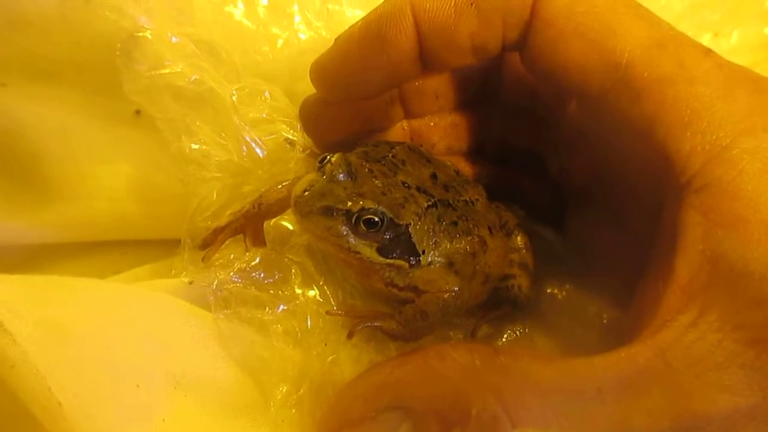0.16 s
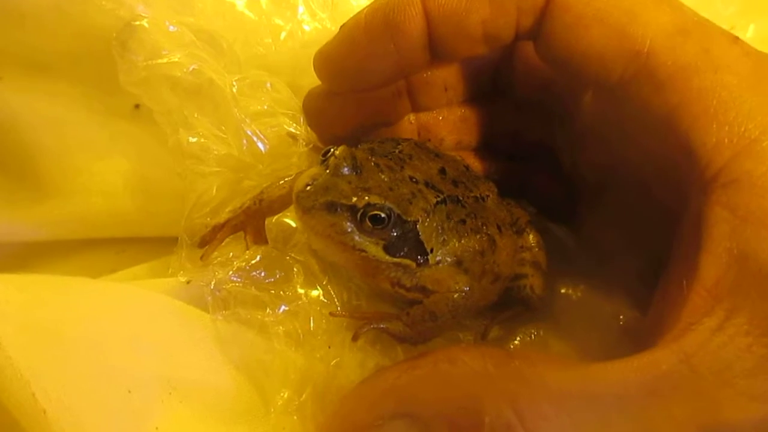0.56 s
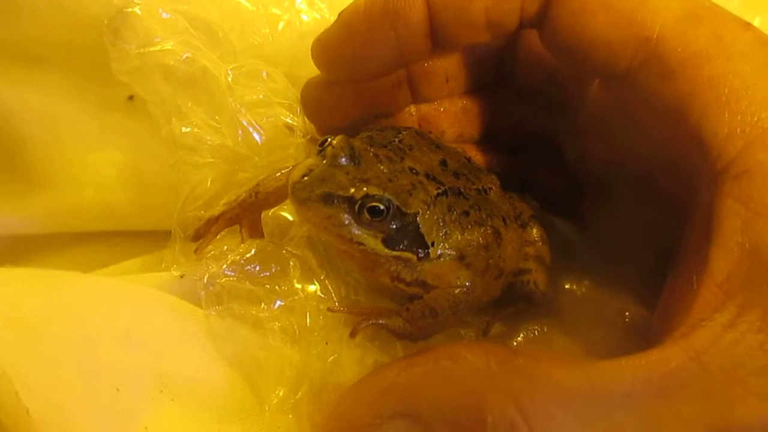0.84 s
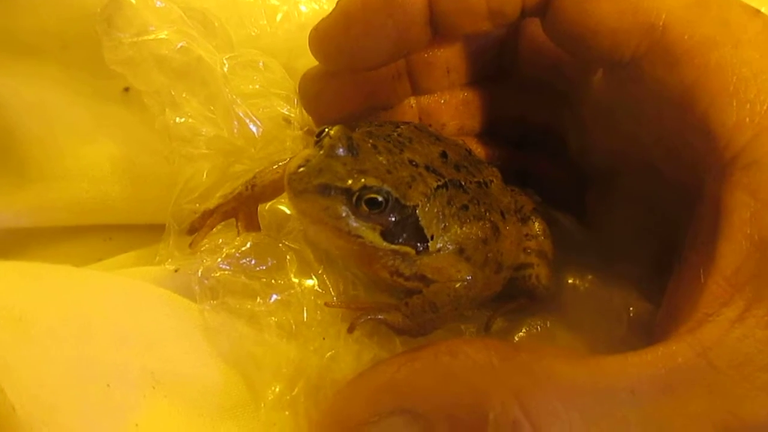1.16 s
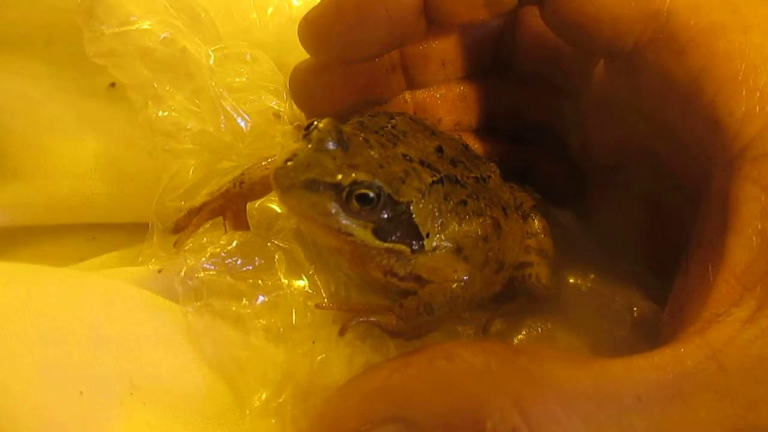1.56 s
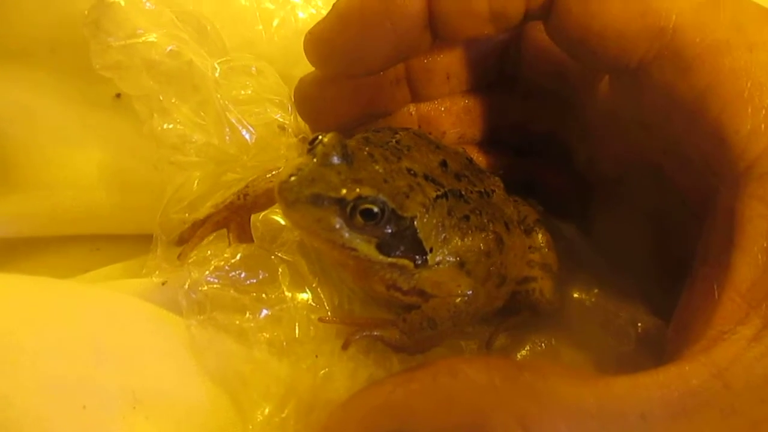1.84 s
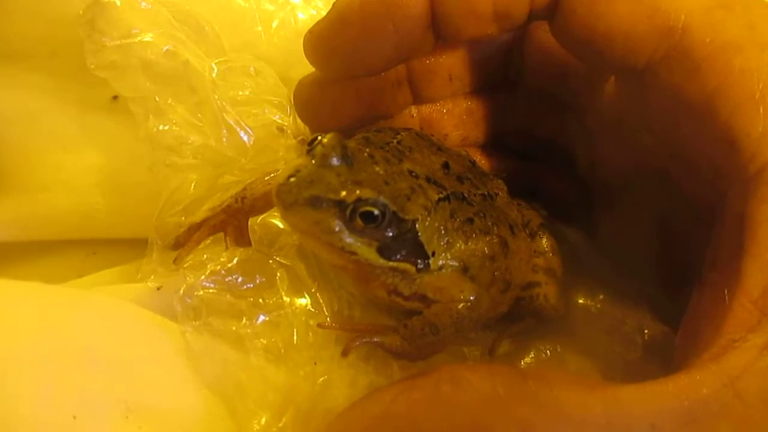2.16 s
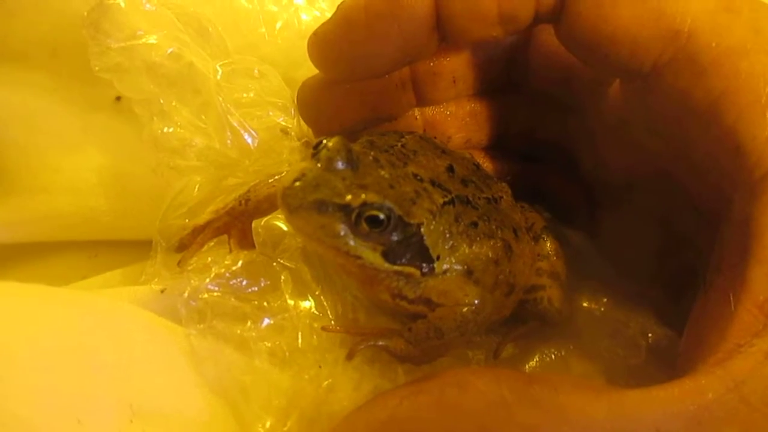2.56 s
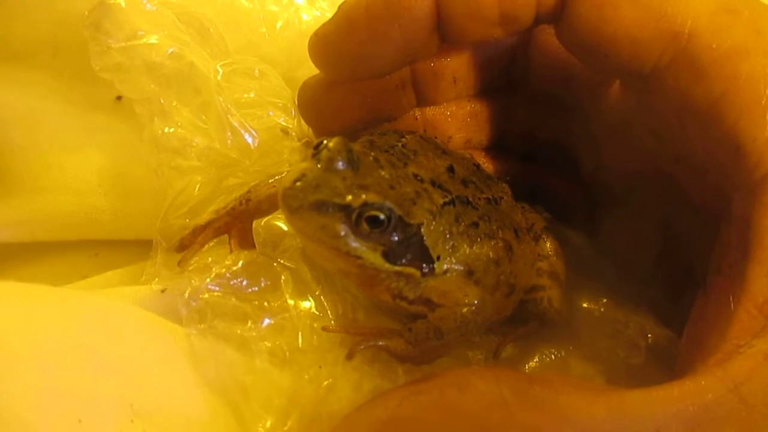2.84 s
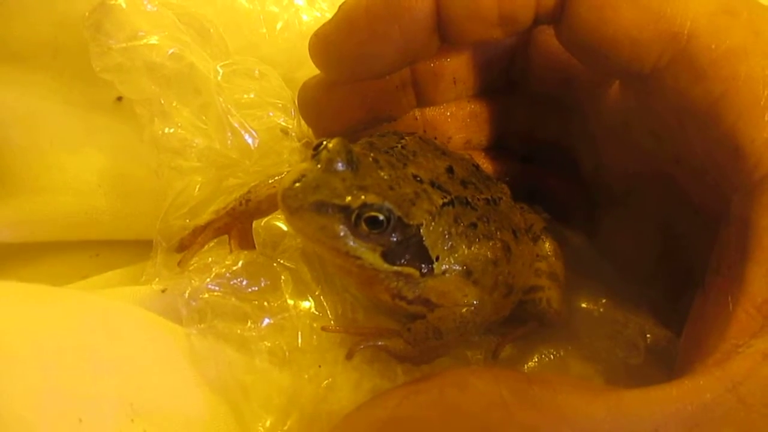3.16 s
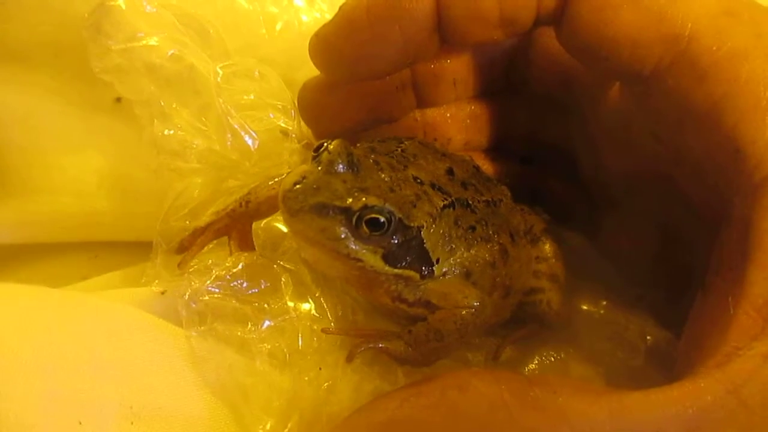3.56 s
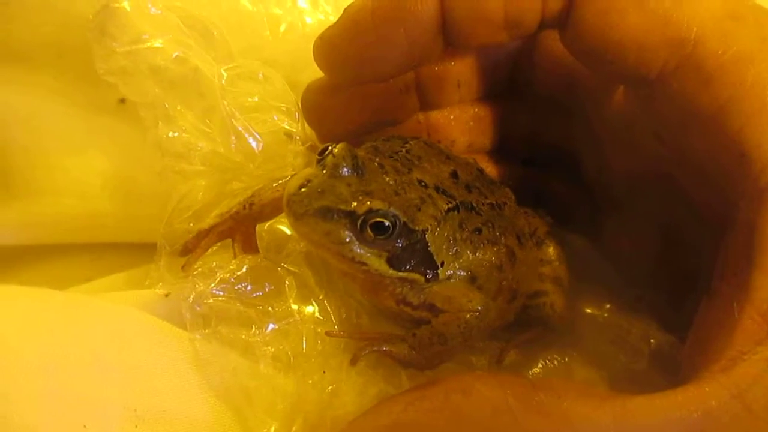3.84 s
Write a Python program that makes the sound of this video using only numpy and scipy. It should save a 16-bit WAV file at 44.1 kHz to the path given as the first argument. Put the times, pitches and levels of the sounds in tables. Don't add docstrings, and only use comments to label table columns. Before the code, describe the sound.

A small frog held in a wet hand, close to the microphone: steady hollow hum and hiss first, one faint croak, then a rapid run of short low croaking pulses, ending with a strong deeper one.

```python
import sys
import numpy as np
from scipy import signal
from scipy.fft import rfft, irfft
from scipy.io import wavfile

SR = 44100
rng = np.random.default_rng(int(sys.argv[2]) if len(sys.argv) > 2 else 0)


def invert_db(level):
    return 10 ** (np.asarray(level, dtype=float) / 20)


def dump_mix(stems):
    frames = np.atleast_2d(stems).T
    limited = np.clip(frames, -1, 1)
    pcm = np.round(limited * 32767).astype(np.int16)
    wavfile.write(sys.argv[1], SR, pcm)


N = 176400

# start in seconds, peak in dB, crack in dB.
DEEP_PULSES = [
    (2.5374, -9, -37.5),
    (3.8869, -12.5, -45.5),
    (3.4420, -39.5, -70),
]
# start in seconds, peak in dB, throat tension 0-1, sac ring in dB, crack in dB.
RUN_PULSES = [(2.7294, -13, .99, -46, -39.5), (2.8090, -19.5, 0.45, -35, -49),
              (2.8861, -12, 0.87, -32.5, -37), (2.9636, -20, 0.3, -36.5, -52),
              (3.0423, -22.5, 0.4, -36, -51), (3.1202, -22.5, 0, -39.5, -51), (3.2040, -26.5, 0, -48, -52),
              (3.2858, -15.5, 0.83, -48, -46.5), (3.3633, -22, 0.2, -46.5, -52),
              (3.479, -33.5, 0.9, -70, -57), (3.525, -25, .02, -45, -55), (3.604, -29, .02, -52, -54),
              (1.949, -37.5, .02, -50, -62), (3.9950, -36, .05, -70, -51)]
# start in seconds, level in dB.
FIRST_PULSE = (1.8885, -26.5)
DEEP_MODES = [(466, -1.5, .033), (591, -10, .063), (627, -4.4, .115), (741, -7, .032), (985, 1.5, .017),
              (1303, -10.4, .033), (1780, -9, .013), (985, -29, .2)]
DEEP_SIGNS = [-1, -1, 1, 1, -1, -1, -1, -1]
TENSE_MODES = [(139, -25, .1), (450, -17, .09), (510, .5, .024), (704, -16, .057), (896, -8, .02),
               (1020, 3.5, .012), (1295, -5.7, .036), (1462, -7.5, .036), (2092, -18.4, .015)]
TENSE_SIGNS = [1, -1, -1, -1, 1, 1, -1, 1, -1]
SLACK_MODES = [(146, -17, .08), (397, -16, .04), (513, 3.4, .02), (676, -23, .032), (715, -9.4, .028),
               (1024, -.4, .013), (1223, -16, .024), (1309, -13, .032), (1487, -22, .026), (800, -20, .05)]
SLACK_SIGNS = [1, 1, -1, 1, -1, 1, 1, -1, 1, 1]
FIRST_MODES = [(520, -6, .033), (582, -6.5, 0.06), (820, -11, .04), (990, -13, .02), (1200, -14, 0.033),
               (1295, -4.5, 0.06), (1585, -2.5, 0.022)]
FIRST_SIGNS = [-1, -1, 1, -1, 1, -1, 1]
# start in seconds, level in dB, frequency in Hz.
WET_TICKS = [(3.4456, -45.5, 5700), (4.4, -43.5, 5900), (2.6474, -41, 2670), (2.5378, -40, 3720),
             (3.7330, -53, 6700), (2.6, -51, 5700), (2.8880, -50.5, 5500), (4.2, -53, 5200),
             (3.8890, -53, 7200)]
# start in seconds, length in seconds, level in dB.
RASPS = [(1.945, 0.027, -65.5), (2.04, 0.011, -58.5), (2.105, .03, -66), (2.23, 0.024, -57.5),
         (2.357, .016, -58), (2.423, 0.038, -64.5), (2.51, 0.027, -69), (2.578, 0.01, -56.5),
         (2.615, 0.043, -59), (2.699, 0.026, -64), (2.787, 0.022, -66), (2.868, 0.011, -62),
         (2.942, 0.026, -60.5), (3.027, 0.026, -64), (3.114, 0.027, -64), (3.182, .025, -67),
         (3.268, .035, -71), (3.35, 0.036, -69), (3.43, 0.021, -61), (3.503, 0.032, -62), (3.583, .03, -63),
         (3.681, 0.055, -58.5), (3.78, 0.023, -64), (3.856, 0.04, -61.5), (3.963, 0.051, -61)]
# frequency in Hz, width in Hz, level in dB.
RASP_PEAKS = [(2640, 360, 6), (3780, 390, 8.5), (4970, 110, -9), (5700, 540, 2)]
# frequency in Hz, width in Hz, level in dB.
TUB_PEAKS = [(487, 40, -7), (614, 86, -4.5), (804, 32.5, -0.5), (896.4, 52, -5), (1157, 45, -3.5),
             (1198, 120, -6.5), (1305.4, 32.6, 4), (1477, 137, -11), (1616, 126, -6.5)]
# time in seconds, level in dB rms.
HUM_LEVEL = [(0.0, -47.5), (0.79, -48), (1.2, -49), (2.64, -47), (3.72, -48.5), (4.0, -48)]
# frequency in Hz, level in dB rms.
MOTOR_LINES = [(1143, -70), (2472, -83)]
# frequency in Hz, level in dB.
HISS_SPECTRUM = [(20, -5.5), (48, -1), (110, -7.5), (300, -12), (2000, -23), (7000, -32.5), (12000, -36.5),
                 (15800, -44.5)]
# start in seconds, level in dB.
BUMPS = [
    (0.486, -38),
    (0.750, -36.5),
]
BUMP_HZ = [52, 84]

MODE_SCATTER_DB = 1.0
TENSE_SWELL_S, SLACK_SWELL_S, DEEP_STOP_S = 0.002, 0.00125, 0.052
SAC_HZ, SAC_T60_S, SAC_SWELL_S = 403.6, 0.28, 0.005
BELLY_HZ, BELLY_DB, BELLY_T60_S, BELLY_STOP_S = 146.2, -17.5, 0.54, 0.21
VALLEY_HZ, VALLEY_WIDTH_HZ, VALLEY_DEPTH = 313, 60, 0.65
CRACK_LOW_HZ, CRACK_HIGH_HZ, CRACK_T60_S, EDGE_TOP_HZ = 1700, 4000, 0.014, 4200
SIZZLE_HZ, SIZZLE_WIDTH_HZ, SIZZLE_S = 2420, 260, 0.018
DEEP_SIZZLE_DB, RUN_SIZZLE_DB = -17.5, -12
TICK_T60_S, TICK_SWELL_S = 0.014, 0.0005
RASP_CLICKS_PER_S, RASP_ATTACK_S, RASP_STOP_S = 5000, 0.0084, 0.0024
HUM_LOW_HZ, HUM_TOP_HZ, HUM_FLICKER_DB = 420, 1782, 0.64
HISS_DB, RUMBLE_TOP_HZ, RUMBLE_FLICKER_DB, RUMBLE_FADE_DB_PER_S = -54, 150, 1, -0.4
BUMP_T60_S, BUMP_SWELL_S = 0.13, 0.015
CUTOFF_HZ = 16200


def rms_one(x):
    return x / np.sqrt(np.mean(x ** 2) + 1e-20)


def drift(rate_hz):
    r = np.exp(-2 * np.pi * rate_hz / SR)
    slow = signal.lfilter([1], [1, -2 * r, r * r], rng.standard_normal(N + SR))
    return rms_one(slow[SR:])


def clicks(starts_s, gains):
    out = np.full(N, 1e-18)
    out[np.clip((np.asarray(starts_s) * SR).astype(int), 0, N - 1)] = gains
    return out


def ring(x, hz, t60_s, swell_s):
    r = invert_db(-60 / (t60_s * SR))
    w = 2 * np.pi * hz / SR

    def tone(r):
        return signal.lfilter([0, np.sin(w)], [1, -2 * r * np.cos(w), r * r], x)

    return tone(r) - tone(r * np.exp(-1 / (swell_s * SR)))


def resonate(x, peaks):
    out = 0
    for k, (hz, width_hz, db) in enumerate(peaks):
        r = np.exp(-np.pi * width_hz / SR)
        b = (1 - r * r) / 2 * np.array([1, 0, -1])
        a = [1, -2 * r * np.cos(2 * np.pi * hz / SR), r * r]
        out = out + (-1) ** k * invert_db(db) * signal.lfilter(b, a, x)
    return out


def strike(starts_s, gains, modes, signs, swell_s):
    scatter_db = rng.normal(0, 1, (len(starts_s), len(modes))) * MODE_SCATTER_DB
    out = np.zeros(N)
    for k, ((hz, db, t60_s), sign) in enumerate(zip(modes, signs)):
        hits = clicks(starts_s, gains * sign * invert_db(db + scatter_db[:, k]))
        out += ring(hits, hz, t60_s, swell_s)
    return out


def frog():
    out = deep_pulses() + run_pulses()
    return out - VALLEY_DEPTH * resonate(out, [(VALLEY_HZ, VALLEY_WIDTH_HZ, 0)])


def deep_pulses():
    t = np.arange(N) / SR
    starts_s, peak_db, crack_db = np.transpose(DEEP_PULSES)
    closed = sum(np.clip((t - s - DEEP_STOP_S) / 0.006, 0, 1) * (t < s + 1 / 3) for s in starts_s)
    out = (1 - closed) * strike(starts_s, invert_db(peak_db), DEEP_MODES, DEEP_SIGNS, TENSE_SWELL_S)
    out += cracks(starts_s, crack_db, DEEP_SIZZLE_DB)
    for s, db in zip(starts_s, peak_db):
        stop = np.clip((s + BELLY_STOP_S - t) / 0.012, 0, 1)
        out += stop * ring(clicks([s], invert_db(db + BELLY_DB)), BELLY_HZ, BELLY_T60_S, 0.002)
    return out


def run_pulses():
    t = np.arange(N) / SR
    starts_s, peak_db, tension, sac_db, crack_db = np.transpose(RUN_PULSES)
    out = strike(starts_s, invert_db(peak_db) * tension, TENSE_MODES, TENSE_SIGNS, TENSE_SWELL_S)
    out += strike(starts_s, invert_db(peak_db) * (1 - tension), SLACK_MODES, SLACK_SIGNS, SLACK_SWELL_S)
    out += cracks(starts_s, crack_db, RUN_SIZZLE_DB)
    for s, db in zip(starts_s, sac_db):
        next_s = np.min(starts_s[starts_s > s], initial=N / SR)
        stop = np.clip((next_s - t) / 0.003 + 1, 0, 1)
        out += stop * ring(clicks([s], invert_db(db)), SAC_HZ, SAC_T60_S, SAC_SWELL_S)
    return out


def cracks(starts_s, db, sizzle_db):
    start = clicks(starts_s + 0.001, invert_db(db))
    fall = signal.lfilter([1], [1, -invert_db(-60 / (CRACK_T60_S * SR))], start)
    hold = signal.lfilter(np.ones(int(SIZZLE_S * SR)), [1], start)
    band = signal.butter(2, [CRACK_LOW_HZ, CRACK_HIGH_HZ], "band", fs=SR, output="sos")
    burst = rms_one(signal.sosfilt(band, rng.standard_normal(N)))
    sizzle = rms_one(resonate(rng.standard_normal(N), [(SIZZLE_HZ, SIZZLE_WIDTH_HZ, 0)]))
    edge = fall * burst + invert_db(sizzle_db) * hold * sizzle
    return signal.sosfilt(signal.butter(8, EDGE_TOP_HZ, fs=SR, output="sos"), edge)


def first_pulse():
    start_s, db = FIRST_PULSE
    return strike([start_s], invert_db(db), FIRST_MODES, FIRST_SIGNS, SLACK_SWELL_S)


def wet_ticks():
    return sum(ring(clicks([s], invert_db(db)), hz, TICK_T60_S, TICK_SWELL_S) for s, db, hz in WET_TICKS)


def rasps():
    t = np.arange(N) / SR
    gate = np.zeros(N)
    for start_s, length_s, db in RASPS:
        rise = (t - start_s) / RASP_ATTACK_S
        fall = (start_s + length_s - t) / RASP_STOP_S
        gate += invert_db(db) * np.clip(np.minimum(rise, fall), 0, 1)
    grains = rng.standard_normal(N) * (rng.random(N) < RASP_CLICKS_PER_S / SR)
    voice = np.zeros(N)
    for hz, width_hz, db in RASP_PEAKS:
        narrow = resonate(grains, [(hz, width_hz, db)])
        voice += resonate(narrow, [(hz, 2 * width_hz, 0)])
    return gate * rms_one(voice)


def hum():
    air = resonate(rng.standard_normal(N), TUB_PEAKS)
    air = signal.sosfilt(signal.butter(8, HUM_TOP_HZ, fs=SR, output="sos"), air)
    air = signal.sosfilt(signal.butter(4, HUM_LOW_HZ, "high", fs=SR, output="sos"), air)
    times_s, db = np.transpose(HUM_LEVEL)
    level_db = np.interp(np.arange(N) / SR, times_s, db)
    return rms_one(air) * invert_db(level_db + HUM_FLICKER_DB * drift(4))


def motor():
    t = np.arange(N) / SR
    return sum(invert_db(db + 3) * np.sin(2 * np.pi * hz * t) for hz, db in MOTOR_LINES)


def bumps():
    return sum(ring(clicks([s], invert_db(db + 1.5)), hz, BUMP_T60_S, BUMP_SWELL_S)
               for (s, db), hz in zip(BUMPS, BUMP_HZ))


def hiss():
    hz = np.maximum(np.arange(N // 2 + 1) * SR / N, 1)
    at_hz, db = np.transpose(HISS_SPECTRUM)
    shape = invert_db(np.interp(np.log(hz), np.log(at_hz), db)) * (hz > 8)
    shaped = rfft(rng.standard_normal(N)) * shape
    low = 1 / (1 + (hz / RUMBLE_TOP_HZ) ** 4)
    fade_db = RUMBLE_FADE_DB_PER_S * (np.arange(N) - N / 2) / SR
    rumble = irfft(shaped * low, N) * invert_db(RUMBLE_FLICKER_DB * drift(6.5) + fade_db)
    return invert_db(HISS_DB) * rms_one(rumble + irfft(shaped * (1 - low), N))


def scene():
    near = frog() + first_pulse() + wet_ticks() + rasps()
    return (near + hum() + motor() + bumps() + hiss())[None]


def top_cut(x):
    return signal.sosfilt(signal.butter(12, 15840, fs=SR, output="sos"), x)


def record(dry):
    low_pass = signal.cheby2(16, 50, CUTOFF_HZ, fs=SR, output="sos")
    return top_cut(signal.sosfilt(low_pass, dry))


dry = scene()
out = record(dry)
dump_mix(out)
```